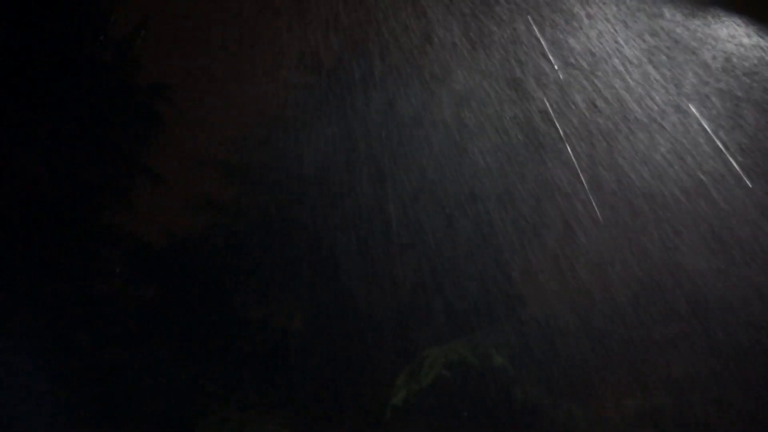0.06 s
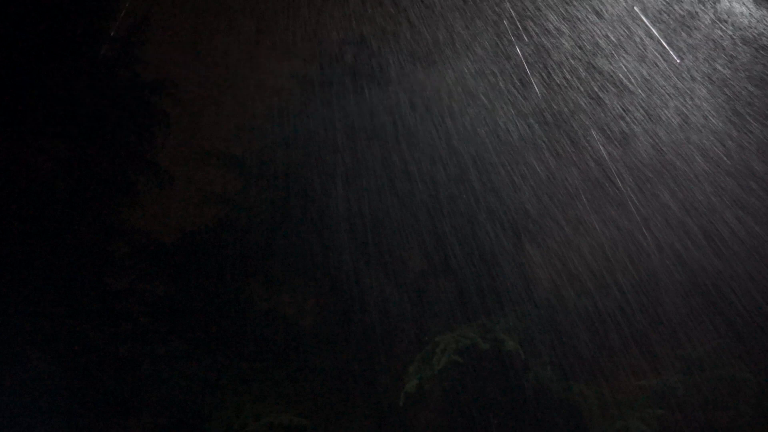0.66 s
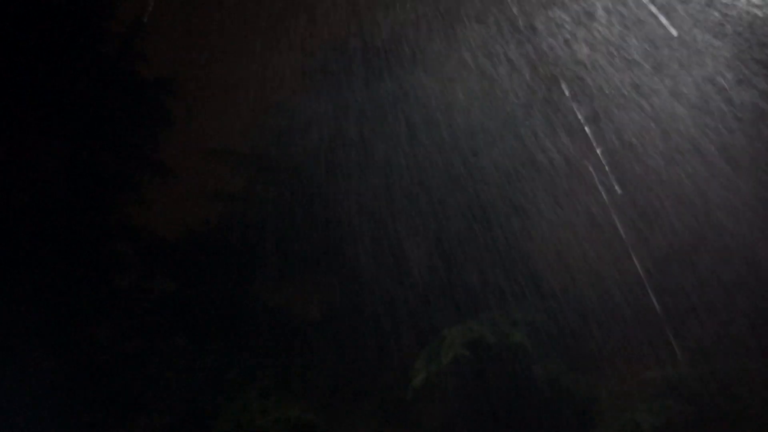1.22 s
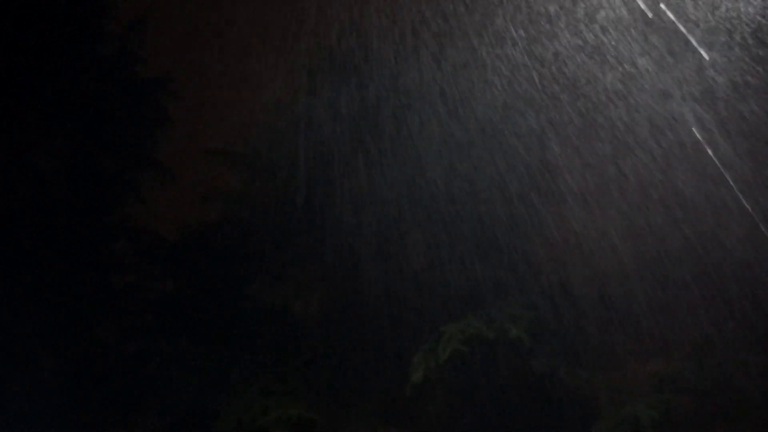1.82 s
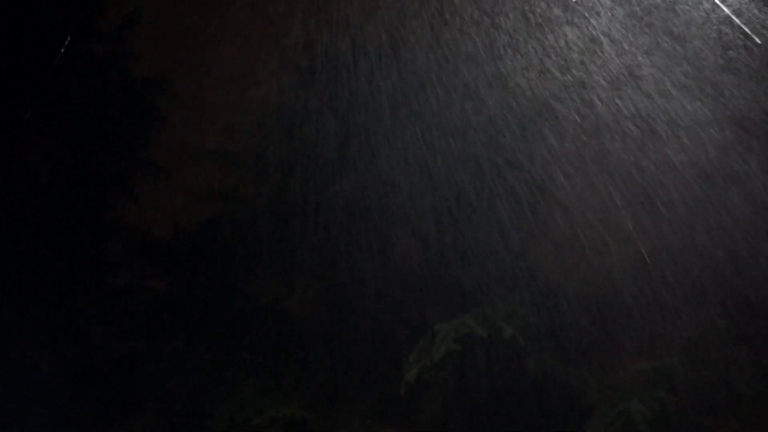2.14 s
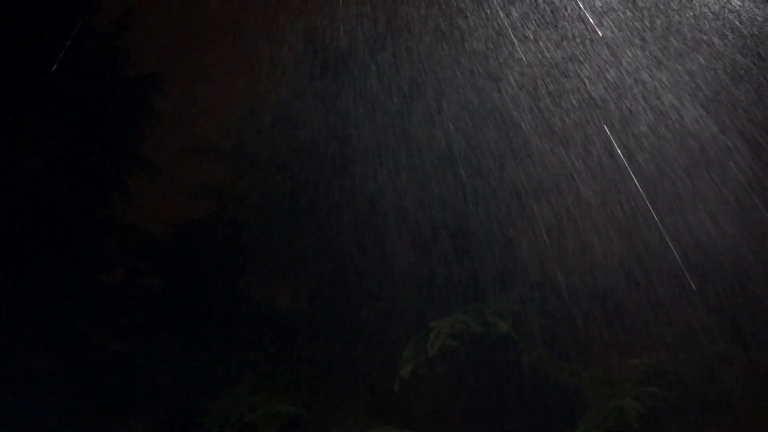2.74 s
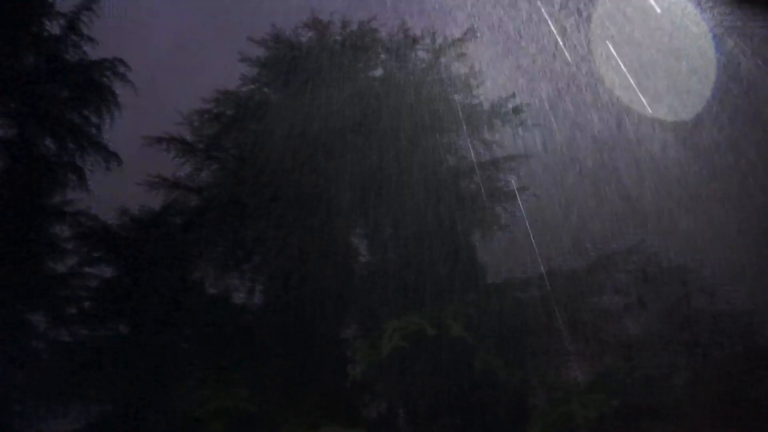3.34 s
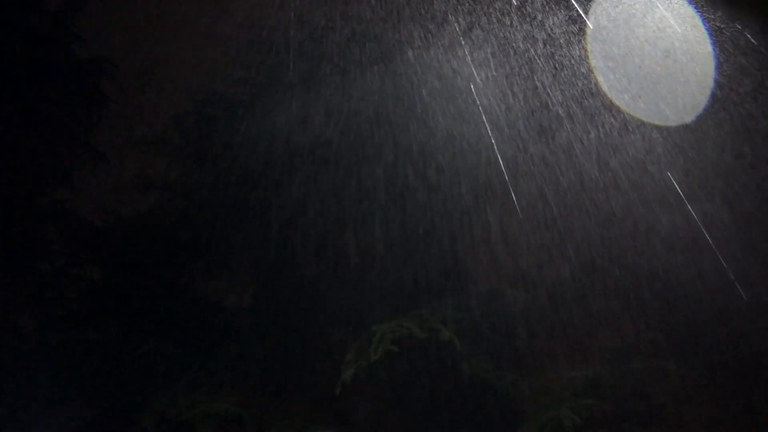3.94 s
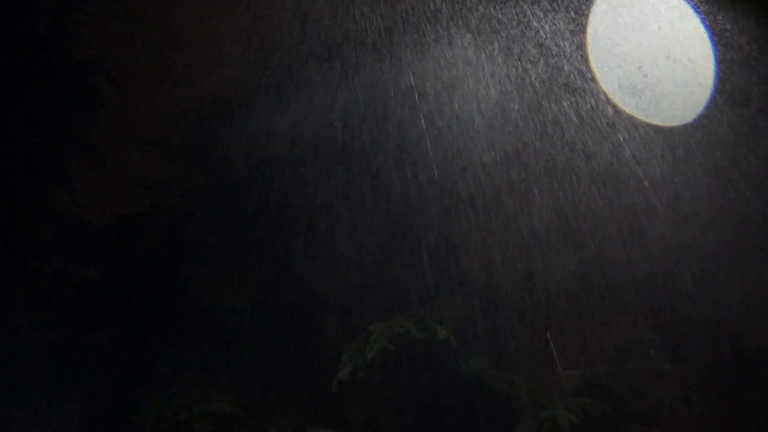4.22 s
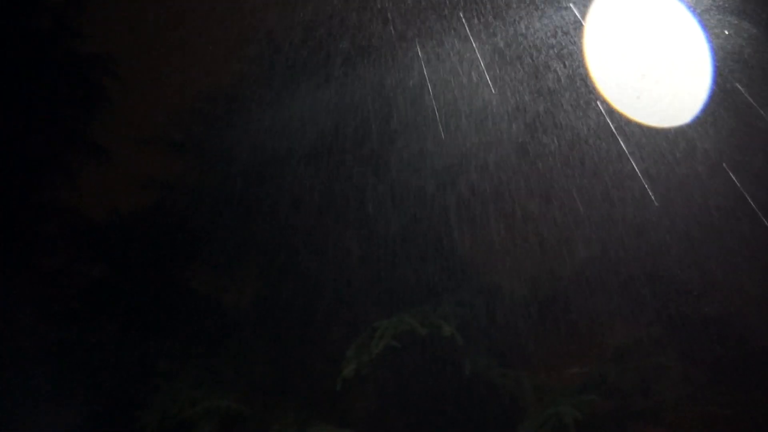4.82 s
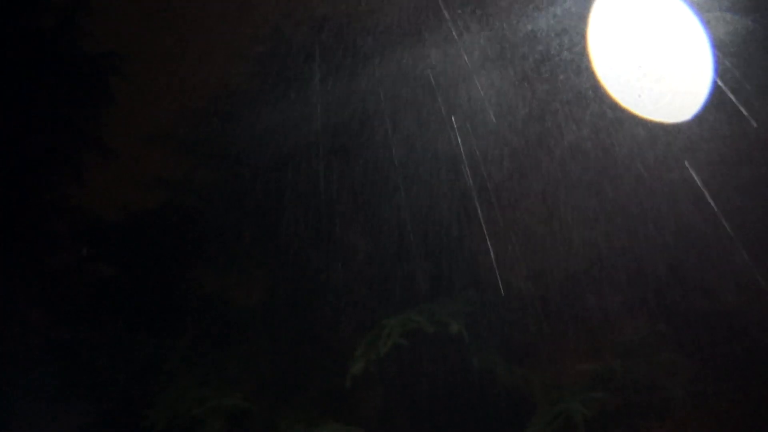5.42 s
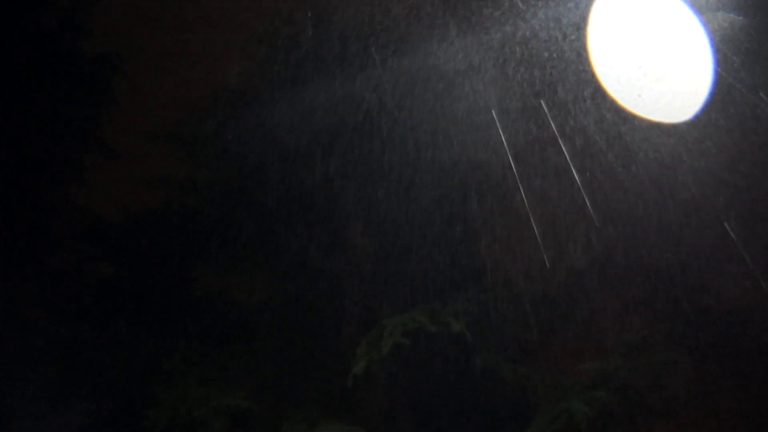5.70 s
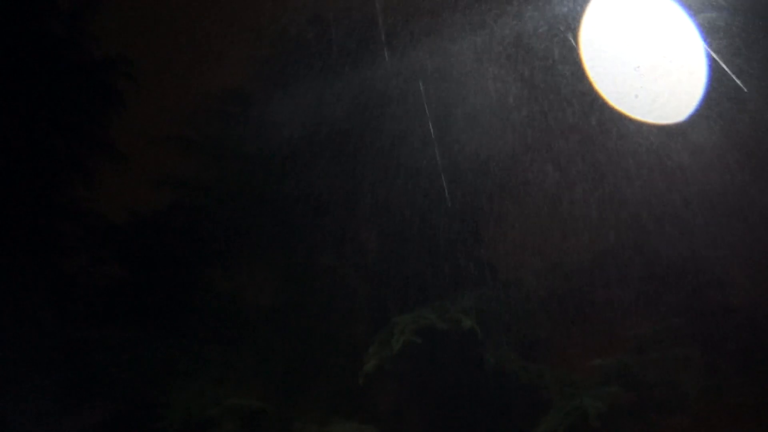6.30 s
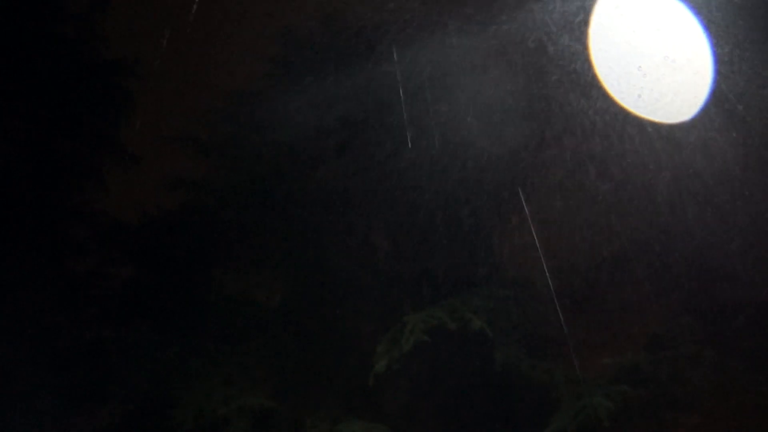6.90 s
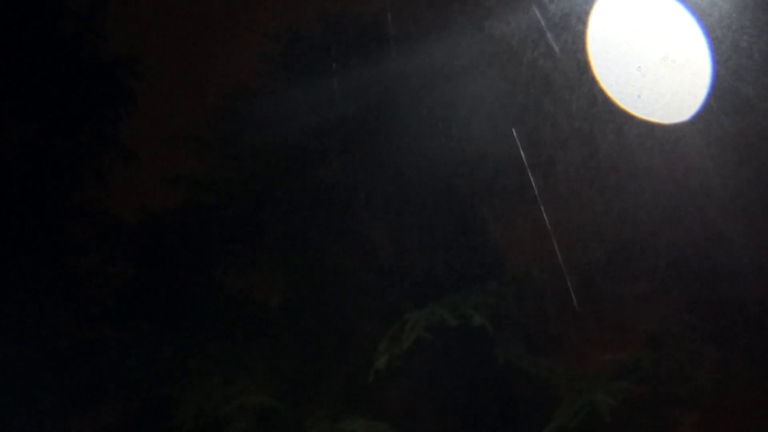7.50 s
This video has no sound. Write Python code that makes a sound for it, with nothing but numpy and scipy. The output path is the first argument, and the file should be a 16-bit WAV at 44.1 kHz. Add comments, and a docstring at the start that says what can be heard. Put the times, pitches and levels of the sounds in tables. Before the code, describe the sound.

Steady heavy rain on trees, roofs and ground, heard from shelter with close splats, until low, far-off thunder swells at the end.

```python
"""A night downpour roars on roofs and ground, heard from under an eave: a blurred wash of water with
heavy drops in it. Countless drops hiss in the trees, nearer ones patter, and big ones splat close by.
Near the end distant thunder rolls in and swells, its scattered shocks dulled by the air,
and an automatic gain control leans on the whole mix as it grows loud."""
import sys
import numpy as np
from scipy import signal
from scipy.fft import rfft, irfft, next_fast_len
from scipy.io import wavfile
from scipy.ndimage import uniform_filter1d

SR = 44100
rng = np.random.default_rng(int(sys.argv[2]) if len(sys.argv) > 2 else 0)


def master_out(mix):
    """Clip the mix to full scale and print it as 16-bit PCM to the path in sys.argv[1]."""
    frames = np.transpose(np.atleast_2d(mix))
    ceiling = np.clip(frames, -1, 1)
    pcm = np.round(ceiling * 32767).astype(np.int16)
    wavfile.write(sys.argv[1], SR, pcm)


N = 332955
TIME = np.arange(N) / SR
FFT_SIZE = next_fast_len(N + 4096)
FREQ = np.fft.rfftfreq(FFT_SIZE, 1 / SR)


def gain_of(db):
    """Decibels to amplitude."""
    return 10 ** (np.asarray(db) / 20)


def unit_rms(pair):
    """Scales a sound so that the average of its channels has rms 1."""
    return pair / np.sqrt(np.mean(pair.mean(0) ** 2) + 1e-20)


def curve(points):
    """Draws a table over log frequency, with a value at every bin."""
    hz, value = np.transpose(points)
    return np.interp(np.log(FREQ + 1), np.log(hz + 1), value)


def faders(rows):
    """Turns each decibel column of a timeline into a gain at every sample."""
    times, *columns = np.transpose(rows)
    return [gain_of(np.interp(TIME, times, db)) for db in columns]


def ramp(start_s, rise_s):
    """Goes from 0 to 1 over the rise, then holds."""
    return np.clip((TIME - start_s) / rise_s, 0, 1)


def band(pair, shape):
    """The part of a stereo pair under a shape over frequency."""
    return irfft(rfft(pair, FFT_SIZE) * shape, FFT_SIZE)[:, :N]


def drift(rate_hz):
    """A slow random wobble of deviation 1, rolled off above the rate."""
    noise = rfft(rng.standard_normal(FFT_SIZE))
    slow = irfft(noise * np.exp(-(FREQ / rate_hz) ** 2), FFT_SIZE)[:N]
    return slow / slow.std()


def impacts(per_s, spread_db, cap):
    """Two unrelated trains of clicks: most alike in size, a few up to cap times the spread away."""
    size = gain_of(spread_db * np.minimum(rng.exponential(1, (2, N)), cap))
    polarity = rng.choice([-1, 1], (2, N))
    hits = rng.random((2, N)) < per_s / SR
    return unit_rms(size * polarity * hits)


def under_eave(pair, colour):
    """Colours two unrelated signals and places them in the shelter: narrow bass, wide treble."""
    # how alike the two microphones sound: frequency_hz, correlation
    likeness = [(30, .56), (70, .9), (130, .92), (300, .9), (480, .88), (640, .81), (820, .9), (1000, .83),
                (1150, .58), (1900, .53), (3050, .08), (3750, .28), (4650, -.14), (6400, 0), (7800, .33)]
    # how far left runs ahead of right: frequency_hz, phase_rad
    lead = [(100, 0), (560, .33), (780, 0.17), (1130, 0.77), (1700, 0.33), (2350, 0.55), (3800, 0.52),
            (7000, 0.046)]
    # how much louder left is than right: frequency_hz, balance_db
    balance = [(100, -0.5), (370, 1), (700, 0), (1020, -1), (1200, 1.5), (1600, 1), (2200, -0.3),
               (3500, -0.1), (6600, -2.3), (9500, 0.15)]
    # resonances of the sheltered corner: pitch_hz, width_hz, lift_db
    shelter = [(120, 14, 2.5), (179, 15, 0.9), (225, 22, -0.2), (280, 17, 1.5), (333, 9.2, 3), (467, 22, 2),
               (567, 16, 3), (703, 20, 1.5), (800, 40, 1.4), (923, 23, 1.8), (1040, 54, 2.5), (1164, 33, 2)]
    first, second = rfft(pair, FFT_SIZE)
    alike = np.clip(curve(likeness), -.99, .99)
    mid, side = first * np.sqrt(1 + alike), second * np.sqrt(1 - alike)
    pan = gain_of(curve(balance) / 2) * np.exp(.5j * curve(lead))
    stereo = np.array([(mid + side) * pan, (mid - side) / pan])
    stereo /= np.sqrt(1 + alike * np.cos(curve(lead)))  # the centre keeps its colour
    shelter_db = sum(db / (1 + (2 * (FREQ - hz) / width) ** 2) for hz, width, db in shelter)
    return unit_rms(irfft(stereo * gain_of(curve(colour) + shelter_db), FFT_SIZE)[:, :N])


def thunder_rumble(fade_db_per_s=39, mutter_db=-56, lumpy_db=-0.5):
    """The low end of the thunder: scattered shocks swell and die with each peal, after a faint mutter."""
    # tone of the deep rumble: frequency_hz, level_db
    rumble_colour = [(20, -29), (45, -23), (65, -13), (90, -4.5), (130, 0), (170, 0.5), (260, -22),
                     (500, -50)]
    # one peal for each bend of the lightning channel: start_s, level_db, rise_s
    peals = [(6.44, -39.5, 0.12), (6.65, -33, 0.08), (7.05, -30, 0.091), (7.42, -30, .08)]
    swells = [ramp(start, rise) * gain_of(db - fade_db_per_s * np.maximum(TIME - start - rise, 0))
              for start, db, rise in peals]
    mutter = ramp(start_s=2.2, rise_s=3.5) * gain_of(mutter_db + lumpy_db * drift(rate_hz=6))
    level = np.sqrt(np.sum(np.square(swells), 0) + mutter ** 2)
    return under_eave(impacts(per_s=400, spread_db=-1.0, cap=3), rumble_colour) * level


def thunder_roll(start_s=6.43, build_s=6.89, top_s=7.36, start_db=-30, top_db=-20.5, growl_db=-4.5):
    """The brighter body of the thunder, dulled by the air; at its loudest it gains a rougher growl."""
    # tone of the rolling body: frequency_hz, level_db
    roll_colour = [(90, -42), (150, -9.5), (185, 0), (222, -1), (258, -0.5), (320, -8), (420, -13),
                   (900, -43)]
    # tone of the growl: frequency_hz, level_db
    growl_colour = [(180, -40), (260, 0), (320, -5), (410, 4), (460, -4), (520, -4), (640, -9), (780, -23),
                    (2000, -55)]

    def swell(lag_s):
        """The roll arrives, builds at an even pace and holds at 1."""
        built = ramp(build_s + lag_s, top_s - build_s)
        return ramp(start_s + lag_s, rise_s=.15) * gain_of((start_db - top_db) * (1 - built))
    body = under_eave(impacts(per_s=900, spread_db=1.5, cap=1.9), roll_colour) * swell(lag_s=0)
    growl = under_eave(impacts(per_s=700, spread_db=1.5, cap=3), growl_colour)
    growl *= swell(lag_s=0.038) ** 1.7  # later and steeper than the body
    return gain_of(top_db) * (body + gain_of(growl_db) * growl)


def foliage_hiss(level, fizz_level, trim_db=1.5, patter_db=-5.5, spray_db=-8, spray_s=0.0049,
                 flutter_db=0.37, fizz_hz=6500, fizz_waver_db=0.42):
    """Countless far drops on foliage, and nearer ones that each tick and throw a brief spray."""
    # tone of rain on leaves: frequency_hz, level_db
    hiss_colour = [(940, -37), (1600, -2.5), (2300, -0.5), (3130, -6), (3700, -5), (4790, -7.5),
                   (6460, -6.5), (8030, -2), (9140, -4.5), (10600, -13), (11000, -17), (14300, -71),
                   (22000, -120)]
    # gusts that fling a brief spatter of water: centre_s, lift_db, half_length_s
    gusts = [(1.66, 1.5, 0.036), (4.96, 0.5, 0.079), (5.756, 2, 0.021), (6.63, 1, 0.033), (7.1, 1.2, 0.05)]
    ticks = impacts(per_s=1700, spread_db=3.0, cap=4.9)
    decay = np.exp(-1 / (spray_s * SR))
    spray_power = signal.lfilter([1], [1, -decay], (ticks ** 2).sum(0))
    spray = unit_rms(np.sqrt(spray_power) * rng.standard_normal((2, N)))
    wash = unit_rms(rng.standard_normal((2, N)))
    water = wash + gain_of(patter_db) * ticks + gain_of(spray_db) * spray
    fizz = band(water, FREQ > fizz_hz)  # the finest spray blows about on its own
    water += fizz * (fizz_level * gain_of(fizz_waver_db * drift(rate_hz=11)) - 1)
    gust_db = sum(db * np.exp(-((TIME - centre) / half) ** 2) for centre, db, half in gusts)
    ride = level * gain_of(trim_db + gust_db + flutter_db * drift(rate_hz=32))
    return under_eave(water, hiss_colour) * ride


def close_splats(trim_db=-1, spray_s=.008, spray_db=-15, spray_octaves=0.44):
    """A big drop slaps and rings for a few cycles while its droplets scatter."""
    # big drops landing close by: start_s, level_db, pitch_hz, cycles_to_peak
    drops = [(0.2922, -10, 2620, 2.2), (1.0515, -16, 3800, 2), (1.1875, -13, 874, 2.8),
             (1.2713, -16, 1940, 3.6), (1.4015, -13, 790, 2.6), (2.274, -14, 850, 2.2),
             (2.867, -12, 790, 2.2), (3.0248, -14, 3800, 2.5), (3.430, -14, 860, 2.6),
             (4.3530, -15.5, 5500, 4), (4.393, -15, 790, 2.4), (4.4068, -14, 8100, 6),
             (4.6780, -18, 7810, 6), (4.7582, -12, 8330, 6), (5.2652, -12, 7730, 6),
             (5.4173, -18, 3800, 2.5), (5.445, -14, 750, 1.8), (5.7497, -12.5, 8110, 6),
             (5.765, -13, 790, 1.3), (5.7922, -16, 7900, 6), (5.8730, -16, 5790, 4),
             (6.1327, -15, 2060, 1.7), (6.279, -14, 905, 3), (6.3033, -16, 3800, 2.5),
             (6.350, -15, 870, 2.8), (6.651, -13, 1450, 1.4), (6.6630, -12, 7630, 6.8),
             (7.0665, -16, 1900, 2.6)]
    out, t = np.zeros((2, N)), TIME[:2048]
    hz = np.fft.rfftfreq(2 * len(t), 1 / SR) + 1
    for start, db, pitch, cycles in drops:
        age = t * pitch / cycles
        slap = age * np.exp((1 - age ** 2) / 2) * np.sin(2 * np.pi * pitch * t)
        burst = np.exp(-t / spray_s) * rng.standard_normal((2, len(t)))
        around_pitch = np.exp(-.5 * (np.log2(hz / pitch) / spray_octaves) ** 2)
        spray = irfft(rfft(burst, 2 * len(t)) * around_pitch)[:, :len(t)]
        splat = gain_of(db + trim_db) * (slap + gain_of(spray_db) * spray / abs(spray).max())
        slot = out[:, round(start * SR):][:, :len(t)]
        slot += splat[:, :slot.shape[1]]
    return out


def ground_roar(level, drum_level, trim_db=1.59, plop_db=-4, flutter_db=0.14, bass_hz=150,
                bass_waver_db=7.5, drum_hz=830, drum_width_hz=170, drum_waver_db=0.3):
    """Water pounds roofs and ground: the low end wavers and a hollow drumming comes and goes."""
    # tone of the pounding water: frequency_hz, level_db
    roar_colour = [(15, -74), (25, -47), (48, -50), (86, -34.5), (164, -18), (267, -9.5), (358, -9),
                   (457, -6), (784, -1), (901, -0.5), (1110, -7.5), (1320, -5.5), (1600, -13), (2080, -49),
                   (3520, -120)]
    wash = unit_rms(rng.standard_normal((2, N)))
    plops = gain_of(plop_db) * impacts(per_s=800, spread_db=2.0, cap=5.0)
    roar = under_eave(wash + plops, roar_colour)
    bass = band(roar, np.exp(-(FREQ / bass_hz) ** 4))
    drum = band(roar, np.exp(-((FREQ - drum_hz) / drum_width_hz) ** 2))
    bass_gain = unit_rms(gain_of(bass_waver_db * drift(rate_hz=14))[None])
    drum_gain = drum_level * gain_of(drum_waver_db * drift(rate_hz=38))
    roar += bass * (bass_gain - 1) + drum * (drum_gain - 1)
    return roar * level * gain_of(trim_db + flutter_db * drift(rate_hz=7))


def scene():
    """Rain all round, thunder far off."""
    # how hard it rains: time_s, roar_db, drumming_lift_db, hiss_db, fizz_lift_db
    rainfall = [(0.0, -23, 0, -24.5, 0.5), (0.22, -24.5, 0.5, -24.5, -0.6), (0.55, -24.1, -1, -24.2, -0.7),
                (0.85, -24, 1, -24, 0.2), (1.15, -24, -1.3, -24, 0.2), (1.4, -23, -1, -24, 0),
                (1.8, -24.1, 1, -24.5, 0.4), (2.25, -24, -0.5, -24, 0), (2.57, -25, 1.7, -24.5, -0.1),
                (2.8, -23.5, 0.5, -23.7, -0.2), (3.15, -24, 0, -24, 0), (3.35, -24.5, 1, -24, -0.3),
                (3.7, -24, -1, -24.5, 0.4), (4.03, -24.5, -2, -23.6, -0.3), (4.22, -25, 2.5, -24, 1.0),
                (4.55, -24.4, -0.5, -24, 0.3), (4.85, -24, -0.6, -24, -0.1), (5.2, -24.5, 1.8, -24, 0.3),
                (5.47, -22.5, -3, -23.5, -1), (5.68, -23.8, 2.5, -24.5, 0.7), (5.87, -25, -0.5, -24.5, 0.5),
                (6.07, -22.5, 0.3, -23.5, 0), (6.35, -23.5, 0.5, -23.5, 0), (6.6, -23.5, -1.3, -23.5, 0),
                (7.0, -24.5, -0.5, -23, 0), (7.25, -24, 0.1, -24, 0), (7.5, -24, -1.5, -25, 0)]
    ground, drumming, foliage, fizz = faders(rainfall)
    rain = ground_roar(ground, drumming) + foliage_hiss(foliage, fizz) + close_splats()
    return rain + thunder_rumble() + thunder_roll()


def record(dry, threshold_db=-18.0, squeeze=0.64, recovery_db_per_s=4, cutoff_hz=11080):
    """Gain control ducks the mix as the thunder swells; a steep low-pass takes off the top."""
    power = uniform_filter1d(dry.mean(0) ** 2, size=9000)
    power_db = 10 * np.log10(abs(power) + 1e-12)
    recovery_db = TIME * recovery_db_per_s
    held_db = np.maximum.accumulate(power_db + recovery_db) - recovery_db  # grabs fast, lets go slowly
    ducked = dry / gain_of(squeeze * np.maximum(held_db - threshold_db, 0))
    low_pass = signal.firwin(2047, cutoff_hz, window=("kaiser", 9), fs=SR)
    return signal.oaconvolve(ducked, low_pass[None], "same")


dry = scene()
out = record(dry)
master_out(out)
```